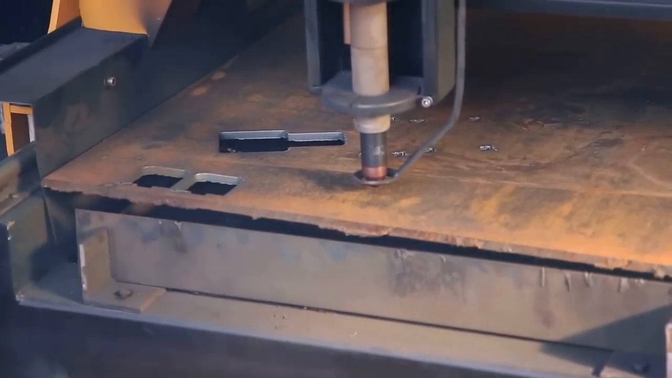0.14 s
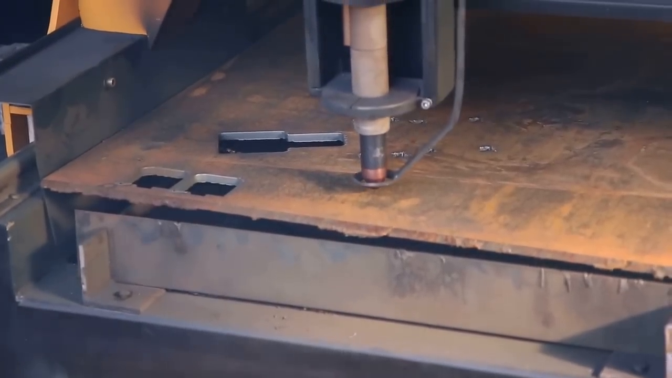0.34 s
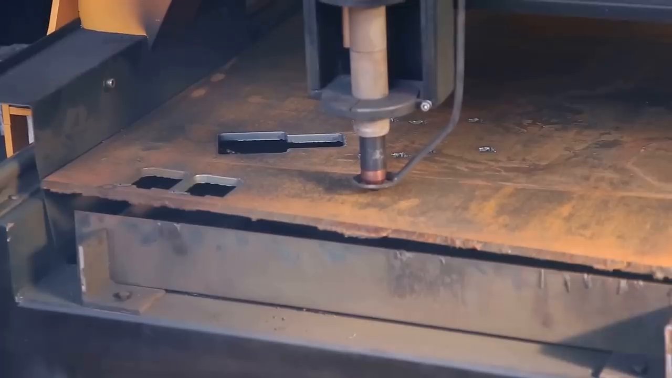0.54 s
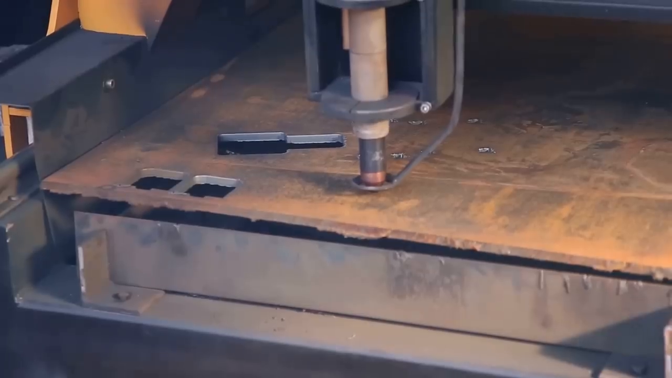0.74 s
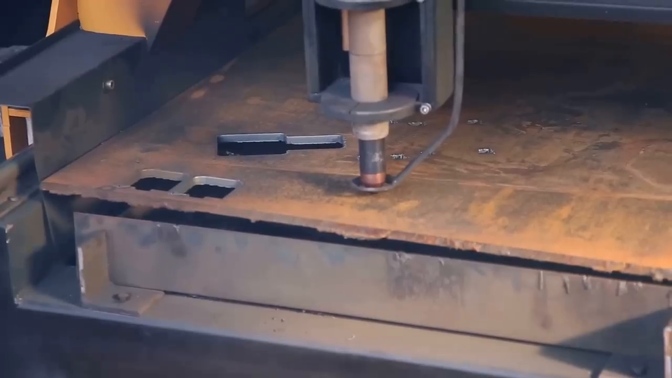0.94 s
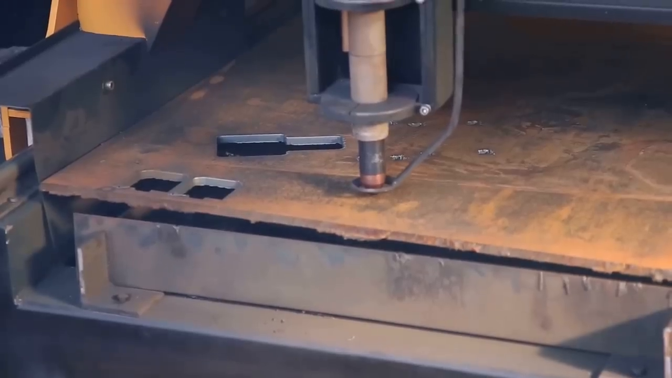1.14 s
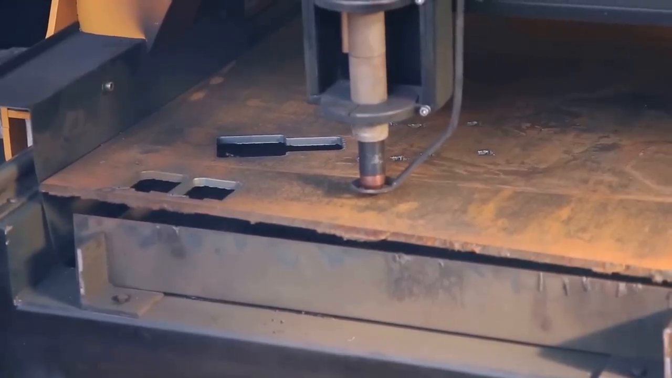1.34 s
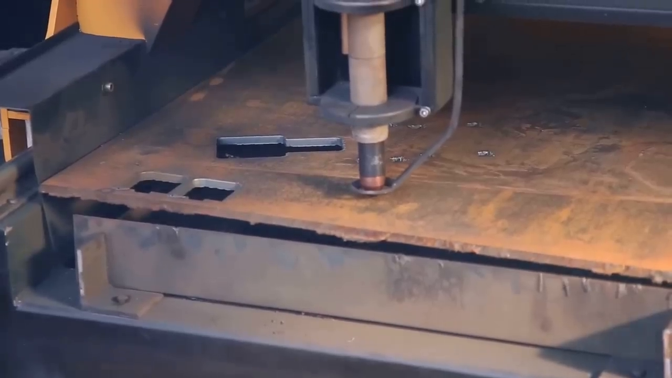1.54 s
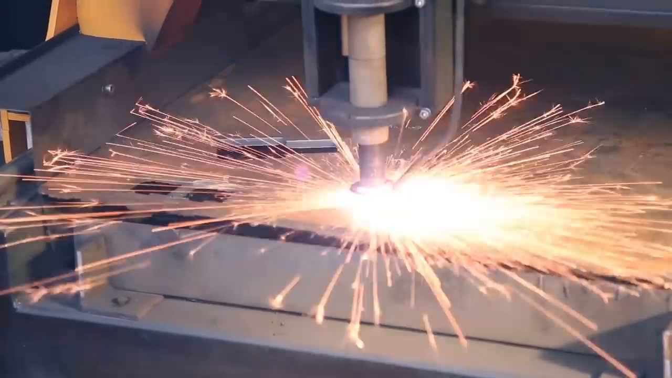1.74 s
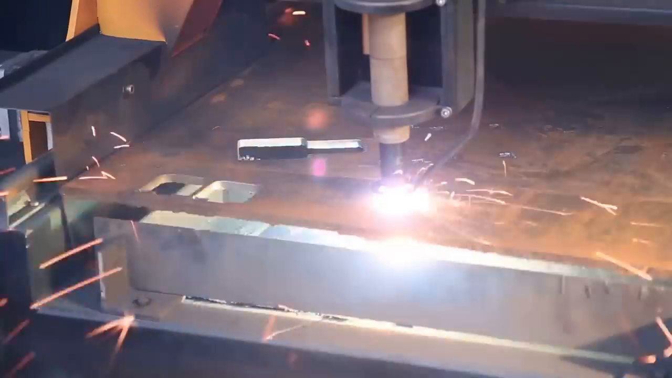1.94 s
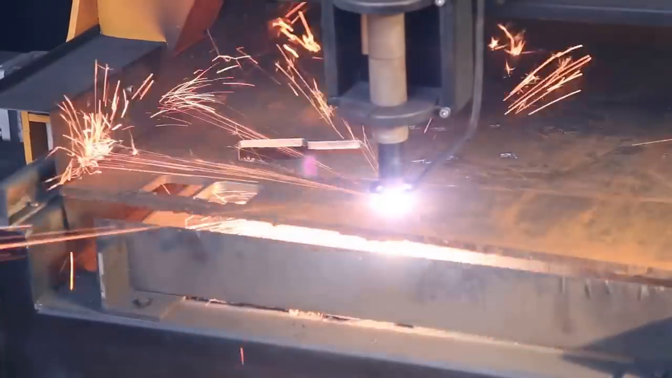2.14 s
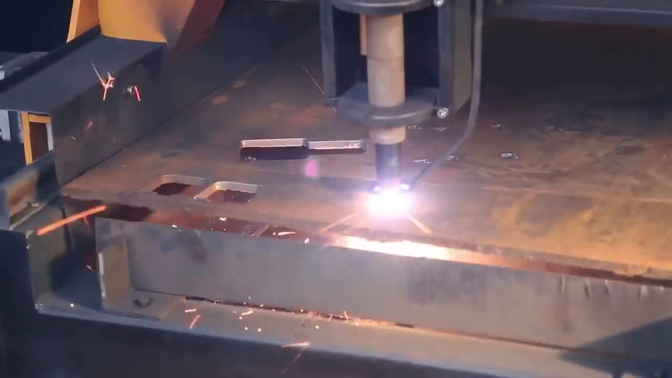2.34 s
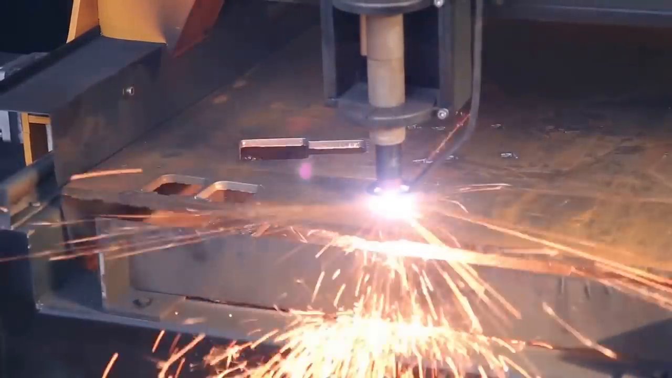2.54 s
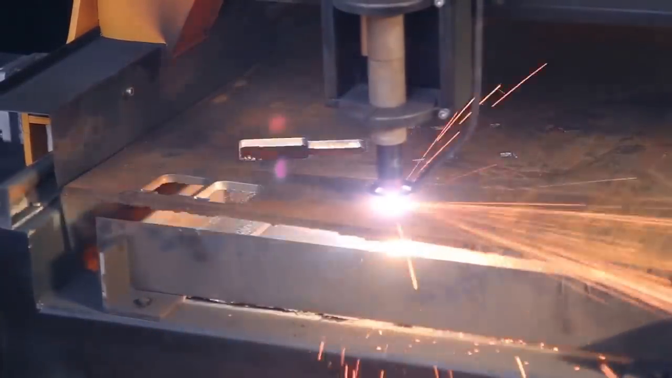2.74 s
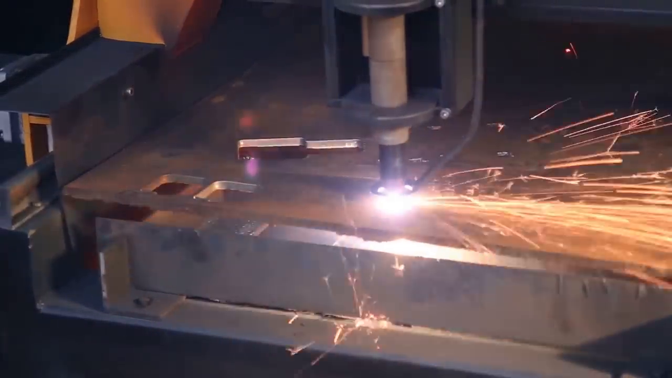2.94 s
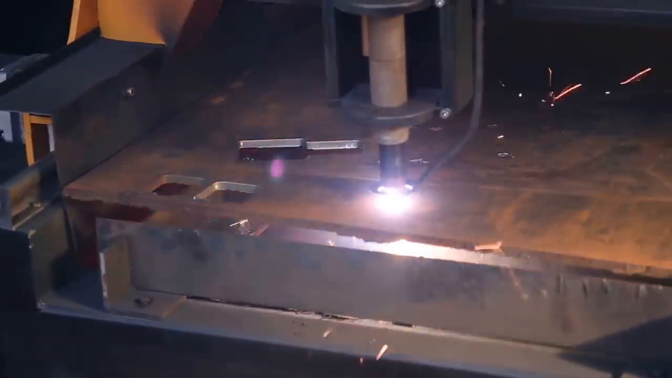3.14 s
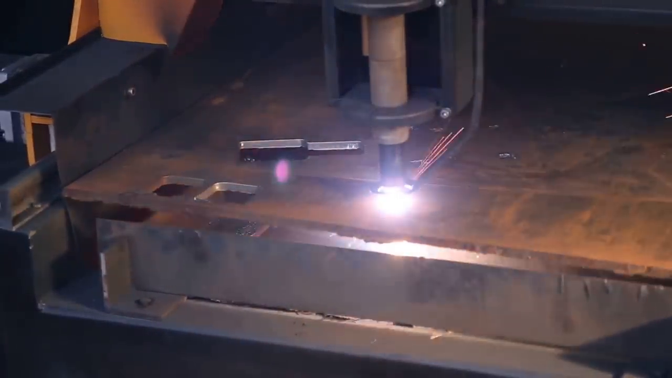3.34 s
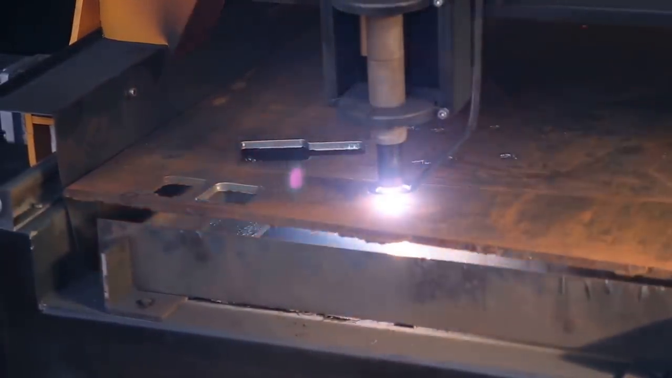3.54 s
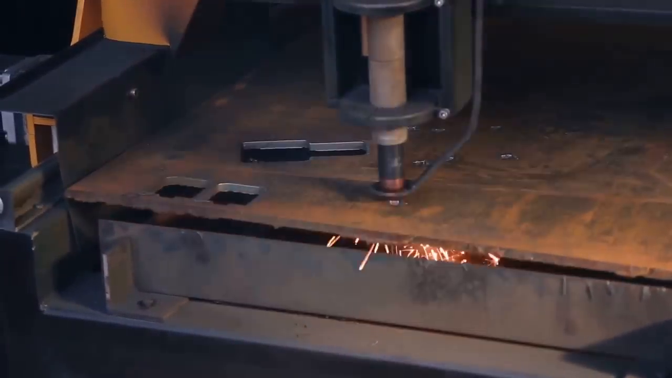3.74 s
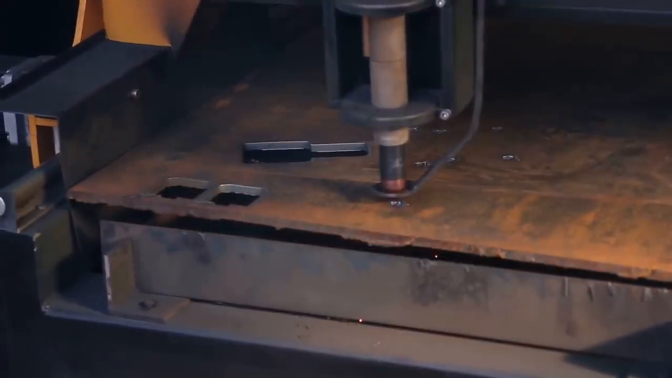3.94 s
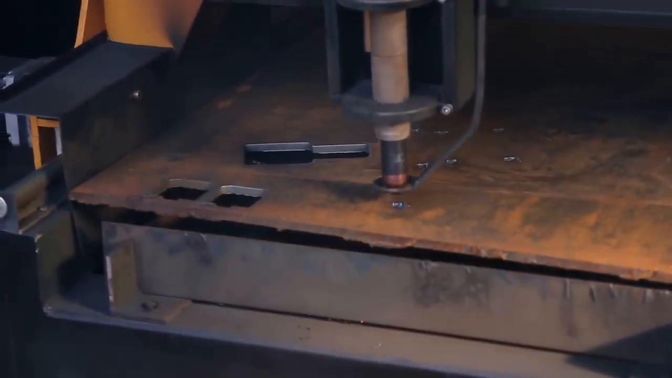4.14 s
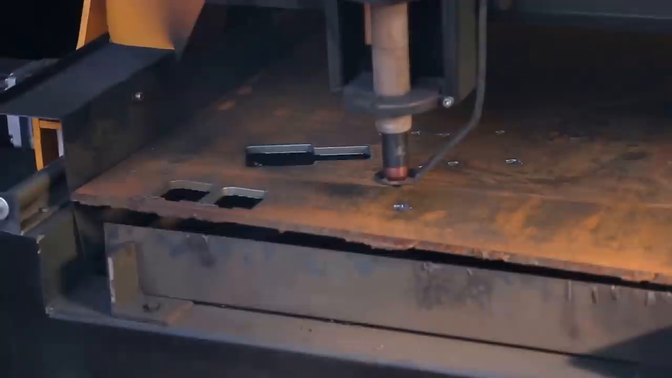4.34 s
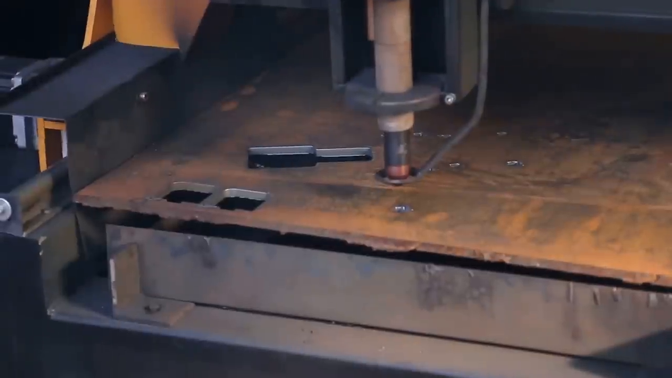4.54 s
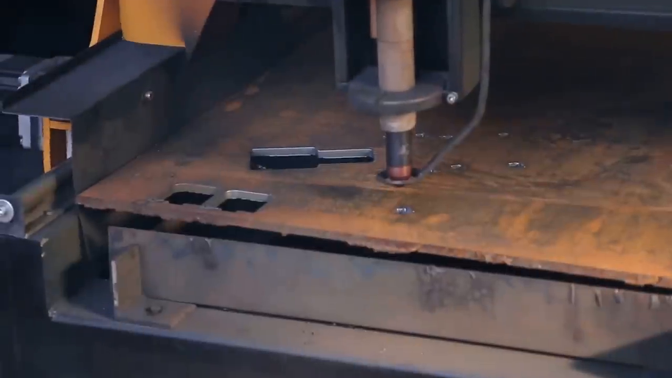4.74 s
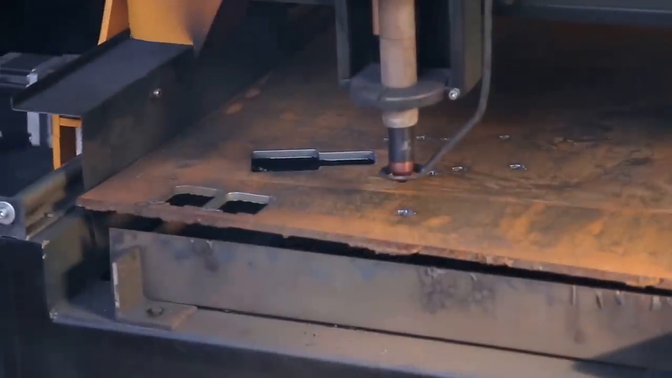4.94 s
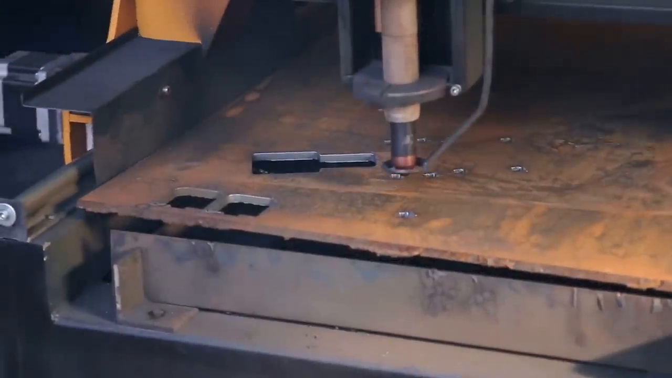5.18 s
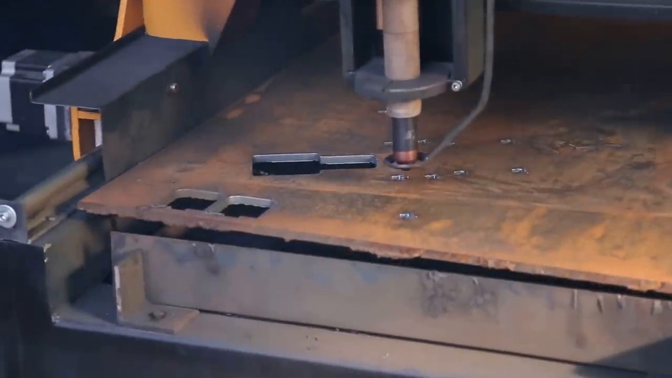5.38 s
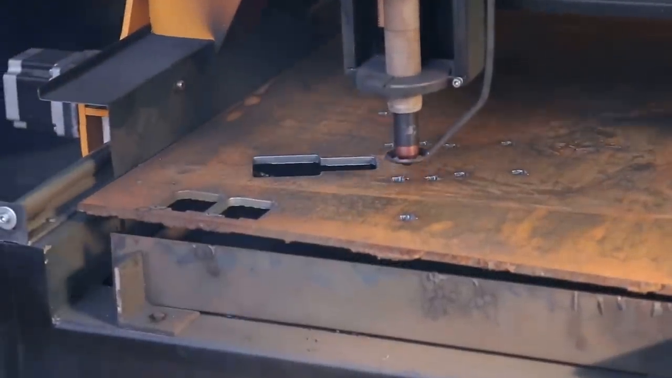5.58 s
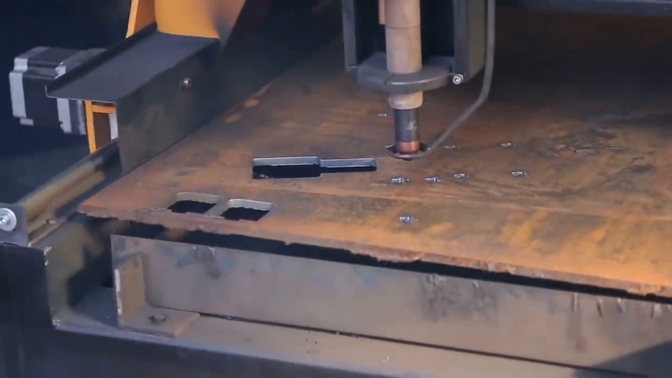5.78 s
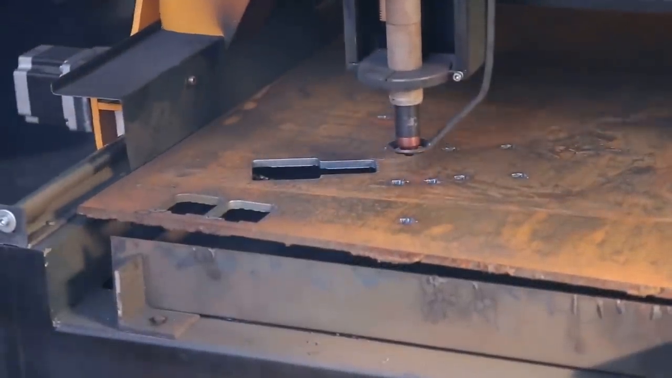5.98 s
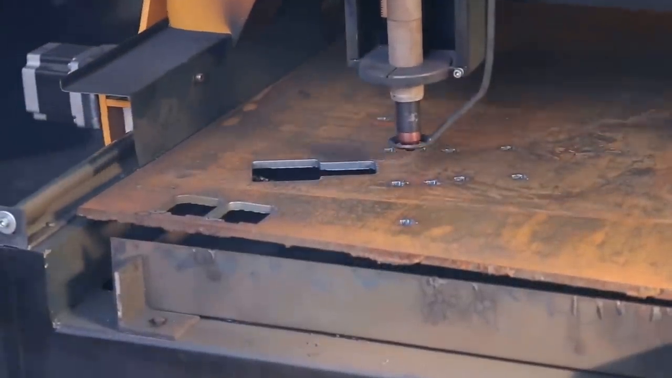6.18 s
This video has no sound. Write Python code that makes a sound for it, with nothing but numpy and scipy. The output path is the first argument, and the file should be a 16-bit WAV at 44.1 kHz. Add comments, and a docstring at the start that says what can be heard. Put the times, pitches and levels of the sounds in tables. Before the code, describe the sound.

Compressed air hisses brightly from a plasma torch while a motor hums low beneath it. The air dies away, and the arc strikes with a sharp snap, hissing and spitting through steel plate for two seconds. It goes out with a pop. The air hiss builds again, briefly turning rougher, as the machine moves off with a faint rumble and whine. The sound is mono, straight ahead, in a workshop with little echo.

```python
"""A plasma cutting table in a workshop, the torch straight ahead of a mono microphone.
Air hisses from the nozzle while a stepper motor hums the torch down to the steel plate. The air stops,
the arc snaps on, pierces the plate, cuts a small hole for two seconds and goes out with a pop.
Cooling air returns and roars across the fresh rim; then the gantry rumbles away with a motor whine."""
import sys
import numpy as np
from scipy import signal
from scipy.fft import rfft, irfft
from scipy.io import wavfile
from scipy.ndimage import map_coordinates

SR = 44100
rng = np.random.default_rng(int(sys.argv[2]) if len(sys.argv) > 2 else 0)


def output_pcm(signal):
    """Save a mono or channel-first signal as 16-bit PCM at the path in sys.argv[1].

    Samples are clipped to [-1, 1] before scaling.
    """
    pcm = np.clip(np.atleast_2d(signal).T, -1, 1) * 32767
    wavfile.write(sys.argv[1], SR, np.round(pcm).astype(np.int16))


N = 273861
TIME = np.arange(N) / SR
FREQ = np.maximum(np.arange(N // 2 + 1) * SR / N, 1)
PILOT_S, ARC_ON_S, ARC_OFF_S = 1.7875, 1.827, 3.805


def arc():
    """The plasma jet hisses, spits and roars through the slot, stronger while it pierces the plate."""
    # Spectra of the hiss and the roar. Each row: frequency in Hz, relative level in dB.
    hiss_spectrum = [(3000, -9.5), (5600, -8), (6500, -5.5), (7400, -4), (8400, -4), (9050, -1), (10700, 1),
                     (12000, -5), (13500, -2.5), (14700, -15), (15800, -10)]
    roar_spectrum = [(100, -17.5), (200, -16.5), (550, -13), (850, -9), (1050, -0.5), (1350, -5),
                     (2000, -1), (2800, -0.5), (4200, 0.5), (5500, -2.5), (8000, -13)]
    # The arc flares and sags. Each row: centre and half length in seconds, hiss and roar change in dB.
    flares = [(1.932, 0.027, 0.5, 2), (2.374, 0.026, -2, 1), (2.47, .05, 3, 1), (2.84, 0.2, 1.7, 1.5),
              (3.14, 0.053, 2.5, 1), (3.3, 0.018, 4, -0.5), (3.39, .04, 2, 2), (3.56, .05, -2.5, -1),
              (3.718, 0.085, 1.7, 2.3)]
    piercing = swell(ARC_ON_S, 0.45)
    hiss_db = -21 + 3 * piercing + surges((s, half, db) for s, half, db, _ in flares)
    roar_db = -26.5 + 1.5 * piercing + surges((s, half, db) for s, half, _, db in flares)
    hiss = colour(noise() + undb(-12.5) * spatter(rate=1000, spread_db=2.0), hiss_spectrum)
    hiss *= undb(hiss_db + 0.96 * walk(9)) * gate(ARC_ON_S, ARC_OFF_S, .001, 0.026)
    roar = colour(noise() + undb(-10.0) * spatter(rate=500, spread_db=2.5), roar_spectrum)
    roar *= undb(roar_db + 0.45 * walk(21)) * gate(ARC_ON_S, ARC_OFF_S, 0.0018, 0.043)
    cut = shimmer(hiss + roar, delay_s=.0016, wander=0.074, echo_db=-21.0) + cavities()
    return cut * undb(0.42 * walk(60))


def spatter(rate, spread_db):
    """Tiny bursts of molten metal, `rate` a second, a few much larger than the rest."""
    size = undb(spread_db * np.minimum(rng.exponential(size=N), 5))
    bursts = rng.random(N) < rate / SR
    return unit(bursts * size * np.sign(noise()))


def shimmer(x, delay_s, wander, echo_db):
    """An echo off the plate through hot, churning gas: its delay wanders, so the hiss phases."""
    lag = SR * delay_s * (1 + wander * walk(5.0))
    echo = map_coordinates(x, [np.arange(N) - lag], order=3)
    return (x + undb(echo_db) * echo) / np.hypot(1, undb(echo_db))


def cavities():
    """The pit rings until the jet is through; then the gap under the plate and the slot take over."""
    # Slot resonances. Each row: multiple of the lowest, starting width in Hz, level in dB.
    slot_modes = [(1, 280, -33), (1.63, 700, -31), (2.1, 420, -33.5), (2.98, 800, -31)]
    # The lowest sinks and recovers as the torch rounds the hole. Each row: time in seconds, pitch in Hz.
    slot_pitch = [(2.0, 4390), (2.4, 4337), (2.55, 3987), (2.82, 3710), (3.02, 4370), (3.7, 4400)]
    through_s = 1.94
    pit = ring(hz=2620, width=570, db=-24.5) * gate(1.868, through_s, 0.062, 0.026)
    gap = ring(hz=1016, width=80, db=-41.5) * gate(through_s, 3.42, .08, 0.027)
    s, hz = np.transpose(slot_pitch)
    modes = sum(ring(multiple * hz[0], width, db) for multiple, width, db in slot_modes)
    glide = np.interp(TIME, s, hz) / hz[0]
    slot = map_coordinates(modes, [np.cumsum(glide)], order=3, mode="mirror")
    return pit + gap + slot * gate(through_s, ARC_OFF_S, .08, .019)


def ring(hz, width, db):
    """Turbulence in one cavity resonance, wavering in level."""
    return undb(db + 2 * walk(5.9)) * resonate(noise(), hz, width)


def pilot_arc():
    """A pilot arc swells just before the main arc strikes."""
    spectrum = [(900, -6), (3000, -1), (4100, 1), (5200, -7), (8000, -6), (12500, 1), (15000, -18)]
    growth = undb(np.interp(TIME, [PILOT_S, ARC_ON_S], [-37, -27]))
    return colour(noise(), spectrum) * growth * gate(PILOT_S, ARC_ON_S, .003, 0.011)


def snaps():
    """Each sudden change of the arc gives a short pressure ring and a crack."""
    # Each row: start in seconds, then level in dB, frequency in Hz and decay in seconds
    # for the ring, and the same three for the crack.
    pops = [(1.7818, -23, 9500, .0004, -24, 10000, .0012), (1.787, -13, 3140, 0.00049, -20, 2600, 0.0017),
            (1.827, -10, 5010, .0002, -8.5, 9500, 0.0069), (2.297, -17, 1050, 0.004, -46, 1100, .008),
            (3.8024, -4, 945, 0.00058, -32, 1995, .004), (3.8044, -9, 1040, 0.0013, -37, 1100, .01),
            (3.8132, -16, 785, 0.0012, -32, 900, .01)]
    out = np.zeros(N)
    for s, ring_db, ring_hz, ring_decay, crack_db, crack_hz, crack_decay in pops:
        tone = np.cos(2 * np.pi * ring_hz * (TIME - s))
        crack = resonate(noise(), crack_hz, width=crack_hz)
        out += undb(ring_db) * tone * gate(s, s, 1 / SR, ring_decay)
        out += undb(crack_db) * crack * gate(s, s, 0.00024, crack_decay)
    return out


def flame_out():
    """The hot gas collapses with a dull puff."""
    puff = colour(noise(), [(90, -8), (140, 2.0), (400, -5.5), (1000, -7.0), (2000, -9), (4000, -10)])
    return undb(-28.5) * puff * gate(ARC_OFF_S, 3.87, 0.032, 0.064)


def approach_air():
    """Air hisses close to the plate until the valve shuts and the hose bleeds empty for ignition."""
    # The jet near the plate. Each row: frequency in Hz, relative level in dB.
    spectrum = [(290, -35), (500, -17), (603, -23), (917, -19.5), (972, -12), (1440, -7), (1630, -11),
                (2210, -6), (3220, -7.5), (3830, -3.5), (5190, -5.5), (6270, -3), (9390, -0.5), (12500, -3),
                (15800, -12.5)]
    # Its resonances. Each row: frequency and width in Hz, relative level in dB.
    tones = [(1130, 510, -20), (2615, 140, -21), (3850, 160, -24), (6140, 250, -15.5), (9620, 360, -13.5),
             (12700, 620, -11)]
    # The hiss swells slightly. Each row: centre and half length in seconds, rise in dB.
    swells = [(.42, 0.035, 1.9), (1.15, 0.37, 1.25)]
    shut_s, closing_s, bleed_db_per_s = 1.449, .035, 130
    bled_s = closing_s * np.logaddexp(0, (TIME - shut_s) / closing_s)
    flow = undb(-19.5 + surges(swells) - bleed_db_per_s * bled_s)
    full = jet(spectrum, tones, flutter_db=0.58)
    # a slower jet is duller
    slow = colour(full, [(500, -2), (4200, 7), (6500, -0.5), (12500, -3), (14000, -9), (16000, -10)])
    pressure = np.clip(flow / undb(-24), 0, 1)
    return (pressure * full + (1 - pressure) * slow * undb(2.5)) * flow * (TIME < PILOT_S)


def cooling_air():
    """Air hisses after the cut; the plate holds its level down until the torch lifts."""
    # The jet of the lifted nozzle. Each row: frequency in Hz, relative level in dB.
    spectrum = [(290, -51), (500, -12), (569, -11), (891, -11), (1060, -7), (1890, -8), (2210, -3),
                (4180, -2), (6270, -0.5), (7350, -0.5), (10400, 1), (12700, 0), (15800, -12.5)]
    # Its resonances. Each row: frequency and width in Hz, relative level in dB.
    tones = [(1070, 260, -17.5), (6300, 420, -14), (9050, 190, -13.5), (10300, 360, -13.5)]
    # The hiss dips just beside the hole. Each row: centre and half length in seconds, change in dB.
    beside_hole = [(5.07, .13, -2.5)]
    clear_s, lifting_s = 5.42, 0.16
    near_plate = np.clip((clear_s - TIME) / lifting_s, 0, 1)
    level_db = -18.5 - 2 * near_plate + surges(beside_hole)
    return jet(spectrum, tones, flutter_db=0.5) * cooling_flow() * undb(level_db)


def edge_roar():
    """The cooling jet breaks up on each rim that it crosses, and only faintly on the flat plate."""
    # The roar at a rim. Each row: frequency in Hz, relative level in dB.
    spectrum = [(400, -46), (750, -6.5), (1200, -4.5), (2200, 2.5), (2900, -1.5), (4200, -2), (5500, -14),
                (9000, -35)]
    # Its resonances. Each row: frequency and width in Hz, relative level in dB.
    tones = [(1273, 22, -14), (1660, 13, -16.5), (2260, 670, -20), (2874, 180, -11)]
    # The jet crosses a cut edge. Each row: start and stop in seconds, level at full flow in dB.
    crossings = [(4.213, 4.925, -23), (5.66, 6.21, -29.5)]
    rims = sum(undb(db) * gate(start, stop, rise=0.32, fall=0.048) for start, stop, db in crossings)
    flat_plate = undb(-39.5)
    return jet(spectrum, tones, flutter_db=1.2) * cooling_flow() * (rims + flat_plate)


def cooling_flow():
    """The air returns when the arc goes out and builds up to full flow."""
    full_s, build_db_per_s = 4.395, 20
    return undb(-build_db_per_s * np.maximum(full_s - TIME, 0)) * gate(ARC_OFF_S, np.inf, .033, 1)


def jet(spectrum, tones, flutter_db):
    """Turbulent air with its narrow resonances; the whole jet flutters."""
    air = colour(noise(), spectrum)
    air += sum(undb(db) * resonate(noise(), hz, width) for hz, width, db in tones)
    return unit(air) * undb(flutter_db * walk(21))


def lift_motor():
    """A stepper hums at multiples of its step rate, swells as it lowers the torch, then runs out."""
    # Each row: multiple of the step rate, relative level in dB.
    harmonics = [(1, -22), (2, 0), (3, -11.5), (4, -13), (5, -24.5), (6, -21.5), (10, -24), (12, -12.5),
                 (14, -16)]
    step_hz, full_s, swell_db_per_s = 80.65, 0.63, 5.5
    phase = 2 * np.pi * np.cumsum(step_hz * (1 + 0.00093 * walk(6.8))) / SR
    hum = sum(undb(db + .5 * walk(6.6)) * np.sin(round(k) * phase + rng.uniform(0, 2 * np.pi))
              for k, db in harmonics)
    level_db = -30 - swell_db_per_s * np.maximum(full_s - TIME, 0)
    return np.sqrt(2) * hum * undb(level_db) * gate(0, 0.92, rise=1 / SR, fall=.11)


def travel_motor():
    """A stepper whines at its step rate as it carries the torch away, fading in and holding."""
    # The whine dips briefly. Each row: centre and half length in seconds, change in dB.
    dips = [(5.95, 0.074, -8)]
    step_hz = 378
    whine = np.sin(2 * np.pi * np.cumsum(step_hz * (1 + .002 * walk(11))) / SR)
    level_db = -33 + surges(dips) + 0.88 * walk(16)
    return np.sqrt(2) * whine * undb(level_db) * gate(4.9, np.inf, rise=.48, fall=1)


def frame_booms():
    """The frame booms with a wavering pitch at each short height correction."""
    # Each row: start and stop in seconds, pitch in Hz, level in dB.
    booms = [(.82, 1.25, 156, -41.5), (1.547, 1.78, 157, -34.5), (1.97, 2.03, 181, -36)]
    wavering_s = np.cumsum(1 + 0.0184 * walk(16)) / SR
    frame = sum(undb(db) * np.sin(2 * np.pi * hz * wavering_s) * gate(start, stop, 0.051, 0.03)
                for start, stop, hz, db in booms)
    return frame * undb(1.2 * walk(14))


def rumble():
    """The table rumbles faintly at rest; each move of the gantry adds its power."""
    # The table's low and upper body. Each row: frequency in Hz, relative level in dB.
    low_body = [(30, -20), (55, -21), (80, -7.5), (102, -1.5), (128, -8.5), (160, 1), (200, -9), (280, -33)]
    upper_body = [(120, -31), (195, 5), (240, -1), (300, 0.5), (370, -0.5), (450, -6), (600, -17),
                  (1050, -17), (1500, -25)]
    # Gantry moves. Each row: start and stop in seconds, low and upper body level in dB.
    moves = [(0.837, 1.08, -43.5, -44), (1.376, 1.78, -40, -45.5), (4.05, 6.21, -45.5, -41.5),
             (5.23, 6.0, -42.5, -34.5)]
    low, upper = undb(-53), undb(-52)
    for start, stop, low_db, upper_db in moves:
        moving = gate(start, stop, rise=0.045, fall=0.16)
        low = np.hypot(low, undb(low_db) * moving)
        upper = np.hypot(upper, undb(upper_db) * moving)
    return low * colour(noise(), low_body) + upper * colour(noise(), upper_body)


def workshop(x, near_db, near_decay, hall_db, hall_t60):
    """Quick reflections off plate and gantry change as the torch travels; the hall adds a duller tail."""
    travelled = np.pi / 2 * np.clip((TIME - ARC_ON_S) / (TIME[-1] - ARC_ON_S), 0, 1)
    near = sum(share(travelled) * reflect(x, 0.00091, near_decay, top_hz=14600)
               for share in (np.cos, np.sin))
    hall = reflect(x, 0.0092, hall_t60 / np.log(1000), top_hz=5000)
    return (x + undb(near_db) * near + undb(hall_db) * hall) / np.hypot(1, undb(near_db))


def reflect(x, delay, decay, top_hz):
    """A dense train of fading echoes, dulled above top_hz."""
    echoes = (noise() * gate(delay, delay, delay / 2, decay))[:SR]
    echoes = signal.lfilter(*signal.butter(1, top_hz, fs=SR), echoes / np.linalg.norm(echoes))
    return signal.fftconvolve(x, echoes)[:N]


def room_tone():
    """The faint, steady noise of the workshop behind the machine."""
    # Each row: frequency in Hz, relative level in dB.
    spectrum = [(45, -12), (100, -4), (400, 5), (700, -2), (2700, 2), (4200, -6), (6000, -13), (12000, -24),
                (15000, -32)]
    return undb(-46.0) * colour(noise(), spectrum)


def undb(db):
    """Decibels to gain."""
    return 10 ** (np.asarray(db) / 20)


def unit(x):
    """Scale to rms 1."""
    return x / np.std(x)


def noise():
    """White turbulence."""
    return rng.standard_normal(N)


def gate(start, stop, rise, fall):
    """Opens at start, dies away after stop; all in seconds."""
    return np.clip((TIME - start) / rise, 0, 1) * np.exp(-np.maximum(TIME - stop, 0) / fall)


def swell(s, half_length):
    """A smooth bump of height 1 around s seconds."""
    return np.exp(-((TIME - s) / half_length) ** 2)


def surges(table):
    """The dB curve of a list of smooth rises and dips."""
    return sum(db * swell(s, half_length) for s, half_length, db in table)


def walk(hz):
    """A smooth random drift with spread 1, mostly slower than hz."""
    return unit(irfft(rfft(noise()) / (1 + (FREQ / hz) ** 2), N))


def colour(x, points):
    """Shape x by a (Hz, dB) spectrum that falls away beyond its ends; rms 1."""
    hz, db = np.transpose(points)
    ends = np.minimum(FREQ / hz[0], 1) ** 2 * np.minimum(hz[-1] / FREQ, 1) ** 2
    return unit(irfft(rfft(x) * ends * undb(np.interp(np.log(FREQ), np.log(hz), db)), N))


def resonate(x, hz, width):
    """One resonance, its width in Hz; rms 1."""
    return unit(signal.lfilter(*signal.iirpeak(hz, hz / width, fs=SR), x))


def scene():
    """Torch and machine straight ahead, the same in both channels."""
    torch = approach_air() + cooling_air() + edge_roar() + arc() + pilot_arc() + snaps() + flame_out()
    torch = workshop(torch, near_db=-8.0, near_decay=0.0087, hall_db=-9, hall_t60=0.28)
    mono = torch + lift_motor() + travel_motor() + frame_booms() + rumble() + room_tone()
    return np.array([mono, mono])


def record(dry):
    """The microphone has a shallow dip at 5.4 kHz; the top is cut steeply."""
    top_hz = 15850
    dip = 0.17 * signal.lfilter(*signal.iirpeak(5400, 7, fs=SR), dry)
    return signal.sosfilt(signal.ellip(12, .1, 80, top_hz, fs=SR, output="sos"), dry - dip)


dry = scene()
out = record(dry)
output_pcm(out)
```